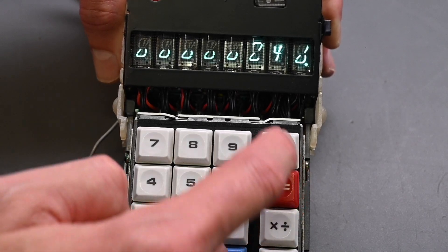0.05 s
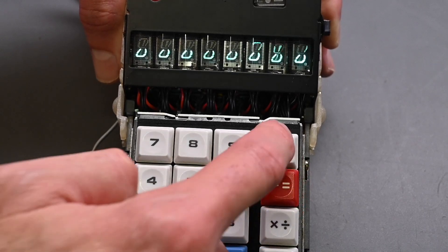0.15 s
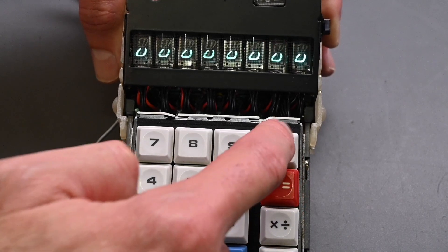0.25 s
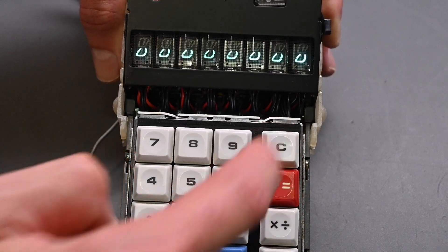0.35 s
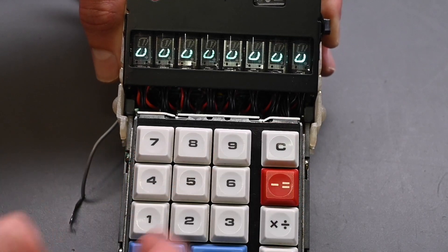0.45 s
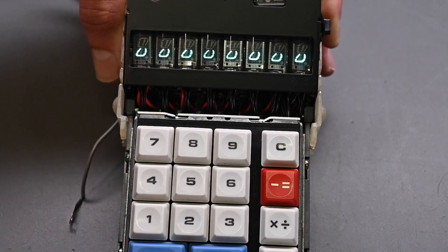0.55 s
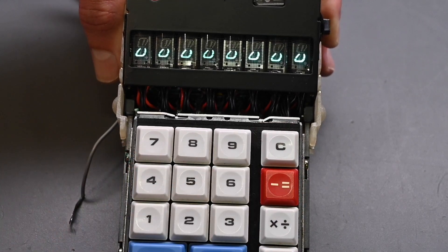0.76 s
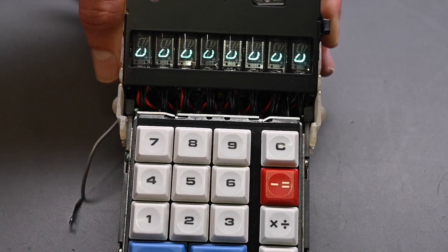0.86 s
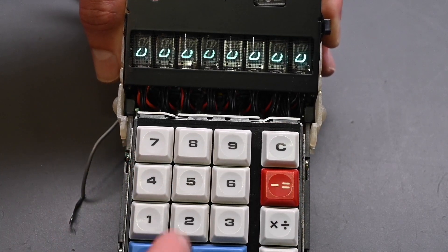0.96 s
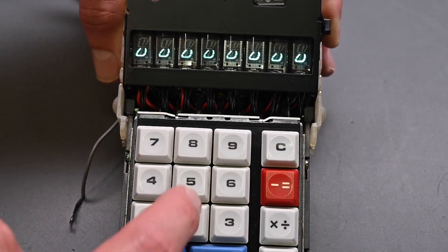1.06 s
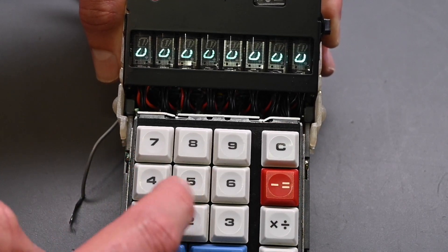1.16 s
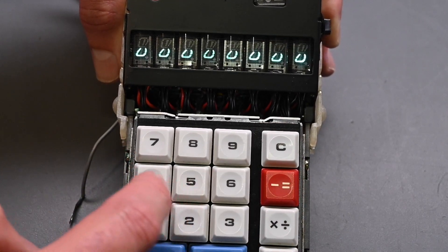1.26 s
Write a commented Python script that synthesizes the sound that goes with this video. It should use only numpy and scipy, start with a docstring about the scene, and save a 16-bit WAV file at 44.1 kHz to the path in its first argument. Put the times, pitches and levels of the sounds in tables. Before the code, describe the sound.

One calculator key is pressed and released up close, a crisp double plastic click with a thump

```python
"""In a small workshop, one key of an old handheld calculator is pressed and let go, heard from close by.
The finger taps the plastic cap, the key bottoms out with a thump into the bench, then springs back up.
Each contact is a burst of tiny rebounds plus ringing plastic and a room tail; case and bench ring as sines.
Coloured noise makes the rubs, a tick, the springy zing, and the faint fan-like whirr and hiss underneath."""
import sys
import numpy as np
from scipy import signal
from scipy.fft import rfft, irfft, next_fast_len
from scipy.io import wavfile

SR = 44100
rng = np.random.default_rng(int(sys.argv[2]) if len(sys.argv) > 2 else 0)


def wav_record(signal):
    """Record a signal, one row per channel, as 16-bit PCM in the file named by sys.argv[1]."""
    frames = np.transpose(np.atleast_2d(signal))
    bounded = np.clip(frames, -1, 1)
    # unit amplitude maps onto the largest positive 16-bit level
    quanta = np.round(bounded * 32767).astype(np.int16)
    wavfile.write(sys.argv[1], SR, quanta)


N = 57330
T = np.arange(N) / SR
# Side level: how loud the left-right difference is against the shared sound, in dB.
AIR_SIDE_DB, ROOM_SIDE_DB = -49.5, -38
RING_BUILD_S = 0.001


def from_db(db):
    """Turn decibels into a gain."""
    return 10 ** (np.asarray(db) / 20)


def rms_one(x):
    """Scale a sound to an rms (average strength) of 1."""
    return x / np.sqrt(np.mean(x ** 2) + 1e-20)


def colour(x, points):
    """Filter through (Hz, dB) points without any sound before the start (minimum phase)."""
    size = 2 * next_fast_len(N)
    hz, db = np.transpose(points)
    freq = np.maximum(np.arange(size // 2 + 1) * SR / size, 1)
    gain = from_db(np.interp(np.log(freq), np.log(hz), db))
    # Folding the cepstrum (the spectrum of the log gain) forward in time gives minimum phase.
    cepstrum = irfft(np.log(gain))
    cepstrum[1:size // 2] *= 2
    cepstrum[size // 2 + 1:] = 0
    response = np.exp(rfft(cepstrum))
    return irfft(rfft(x, size) * response)[..., :N]


def high_pass(x, hz):
    """Remove what lies below a frequency, gently."""
    return signal.sosfilt(signal.butter(2, hz, "high", fs=SR, output="sos"), x)


def noise(side_db):
    """Two channels of white noise that share a middle and differ by a side part."""
    mid, side = rng.standard_normal((2, N))
    return mid + from_db(side_db) * side * np.array([[1], [-1]])


def narrow_noise(hz, width_hz):
    """Noise through one narrow resonance: a wavering tone of rms 1."""
    freq = np.arange(N // 2 + 1) * SR / N
    resonance = 1 / (1 + ((freq - hz) / width_hz) ** 2)
    return rms_one(irfft(rfft(rng.standard_normal(N)) * resonance, N))


def dying(t60, build_s, start=0):
    """Envelope that builds up, then dies away by 60 dB in t60 seconds."""
    age = np.maximum(T - start, 0)
    return (1 - np.exp(-age / build_s)) * from_db(-60 * age / t60)


def mode(hz, t60, build_s):
    """One way a solid body rings: a sine that builds up and dies away."""
    return np.sin(2 * np.pi * hz * T) * dying(t60, build_s)


def delayed(x, s):
    """Start x at time s."""
    lag = int(s * SR)
    return np.concatenate([np.zeros_like(x[..., :lag]), x[..., :N - lag]], axis=-1)


def swelling(rows, spectrum, side_db):
    """Coloured noise under bell-shaped swells."""
    level = sum(from_db(db) * np.exp(-((T - s) / length) ** 2) for s, length, db in rows)
    return level * rms_one(colour(noise(side_db), spectrum))


def whirr():
    """Steady fan-like whirr: white noise given a mostly low colour."""
    # Colour of the whirr. Each row: frequency in Hz, relative level in dB.
    whirr_colour = [(25, -42), (45, -47), (70, -8.5), (105, -3.5), (150, -0.5), (195, -6.5), (255, -1.5),
                    (370, -5.5), (540, -7.5), (690, 1), (860, -5.5), (950, -8.5), (1250, -12), (1600, -8),
                    (1850, -17.5), (2400, -23), (3700, -17.5), (4500, -23), (8000, -28.5), (16000, -53)]
    whirr_db = -67
    return from_db(whirr_db) * rms_one(colour(noise(AIR_SIDE_DB), whirr_colour))


def wavering_tones():
    """Narrow bands of noise in the whirr, heard as tones that waver."""
    # The tones. Each row: frequency in Hz, width in Hz, rms level in dB.
    tones = [(742.7, 8.3, -73), (770, 14.6, -74.5), (841.8, 9.4, -75), (1667, 13.4, -77), (3743, 41, -87),
             (8780, 12, -94.5), (8785, 24, -93)]
    return sum(from_db(db) * narrow_noise(hz, width_hz) for hz, width_hz, db in tones)


def rumble_swells():
    """A low rumble of coloured noise swells briefly, twice."""
    # The swells. Each row: centre in seconds, length in seconds, level in dB.
    swells = [(.775, .06, -64.5), (1.25, 0.048, -74)]
    # Colour of the rumble. Each row: frequency in Hz, relative level in dB.
    swell_colour = [(40, -48), (100, 5.5), (150, -5), (250, 0), (450, -36), (750, -2.5), (1200, -32),
                    (4000, -41)]
    return swelling(swells, swell_colour, AIR_SIDE_DB)


def guide_rubs():
    """The key rubs in its guide: friction as short swells of coloured noise."""
    # The rubs. Each row: centre in seconds, length in seconds, level in dB.
    rubs = [(.238, 0.022, -64.5), (.2545, 0.0035, -54), (.29, 0.013, -61), (.324, 0.0066, -65.5),
            (.374, 0.0065, -62), (.57, 0.064, -78.5)]
    # Colour of the rubbing. Each row: frequency in Hz, relative level in dB.
    rub_colour = [(1000, -29), (2500, -9.5), (3400, -0.5), (5500, 10), (7500, 3), (10000, -4), (15000, -19)]
    return swelling(rubs, rub_colour, ROOM_SIDE_DB)


def held_tick():
    """The held key ticks once: a short, bright burst of noise."""
    # Colour of the tick. Each row: frequency in Hz, relative level in dB.
    tick_colour = [(2000, -30), (4000, -16), (5200, -4), (8000, 3), (10500, -9), (15000, -19)]
    tick_s, tick_db, tick_t60_s = .3188, -52.5, .028
    tick = rms_one(colour(noise(ROOM_SIDE_DB), tick_colour))
    return from_db(tick_db) * tick * dying(tick_t60_s, RING_BUILD_S, tick_s)


def spring_zing():
    """The freed spring zings: several close, wavering tones die away together."""
    # Close modes of the spring: one frequency in Hz for each.
    spring_hz = [9050, 9370, 9500, 9620, 9930]
    spring_s, spring_db, spring_t60_s = .382, -53.5, 0.23
    coils = rms_one(sum(narrow_noise(hz, width_hz=70) for hz in spring_hz))
    return from_db(spring_db) * coils * dying(spring_t60_s, RING_BUILD_S, spring_s)


def case_ring():
    """The case rings in a few low modes as the key comes back."""
    # Modes of the case. Each row: frequency in Hz, level in dB, t60 in seconds.
    case_modes = [(224.4, -52, 0.14), (673, -44, .055), (776, -48.5, 0.13), (1690, -55.5, 0.12)]
    start_s, build_s = .3875, 0.0014
    ring = sum(from_db(db) * mode(hz, t60, build_s) for hz, db, t60 in case_modes)
    return delayed(ring, start_s)


def bench_shake():
    """The bench shakes in mostly deep modes, each with its own build-up."""
    # Modes of the bench. Each row: frequency in Hz, relative level in dB, t60 in seconds, build-up in seconds.
    bench_modes = [(111, -22, 0.079, 0.065), (144.3, -28.5, 0.07, 0.0045), (163, -20, 0.098, 0.026),
                   (176.9, -27, 0.108, 0.0305), (189.3, -30, 0.22, 0.026), (100.6, -43, 0.35, 0.026),
                   (391, -52, 0.324, 0.0073), (558, -55.5, 0.27, 0.0019)]
    return sum(from_db(db) * mode(hz, t60, build_s) for hz, db, t60, build_s in bench_modes)


def thumps():
    """The key's end stops knock on the hollow case, which then shakes the bench."""
    # The blows. Each row: knock start in seconds, knock level in dB, knock t60 in seconds,
    # knock tilt in dB per octave, bench start in seconds, bench gain in dB.
    blows = [(0.2612, -47, 0.23, -2.5, .2661, -1), (0.3863, -53, 0.38, 2, .394, -19.5)]
    # Colour of a knock before its tilt. Each row: frequency in Hz, relative level in dB.
    knock_colour = [(25, -52), (50, -21), (110, -4), (220, 6.5), (330, -2.5), (500, -3.5), (700, -3),
                    (900, -13.5), (1300, -22), (2500, -36)]
    knock_build_s = 0.0012
    bench = bench_shake()
    out = np.zeros((2, N))
    for knock_s, knock_db, t60, tilt_db, bench_s, bench_db in blows:
        tilted = [(hz, db + tilt_db * np.log2(hz)) for hz, db in knock_colour]
        knock = rms_one(colour(noise(AIR_SIDE_DB), tilted))
        out += from_db(knock_db) * knock * dying(t60, knock_build_s, knock_s)
        out += from_db(bench_db) * delayed(bench, bench_s)
    return out


def room_response():
    """Echoes blurred into a noise tail of unit energy; the treble dies first."""
    split_hz, build_s = 5500, 0.0016
    low_t60_s, treble_t60_s = 0.39, 0.27
    white = noise(ROOM_SIDE_DB)
    low = signal.sosfilt(signal.butter(2, split_hz, fs=SR, output="sos"), white)
    high = high_pass(white, split_hz)
    # Subtracting keeps the two bands from cancelling where they meet.
    tail = low * dying(low_t60_s, build_s) - high * dying(treble_t60_s, build_s)
    return rms_one(tail) / np.sqrt(N)


def chatter(spacing_ms, count=4):
    """A hard contact and its quick, weakening rebounds, as single-sample pulses."""
    loss_db = 3.5  # per rebound
    pulses = np.zeros(N)
    for k in range(count):
        pulses[int(k * spacing_ms * SR / 1000)] += from_db(-loss_db * k)
    return pulses


def key_clicks():
    """Each contact chatters, rings the plastic in dense and in single modes, and sounds the room."""
    # Tap, bottoming and return. Each row: start in seconds, level in dB, chatter spacing in ms,
    # dense ring level in dB, dense ring t60 in seconds, room level in dB.
    clicks = [(0.2109, -6.5, .76, 2, 0.02, -18.5), (0.2589, -4.5, .58, 0, 0.047, -19.5),
              (0.3807, -5.5, 0.84, 4, 0.025, -16)]
    # Colour of the tap on the cap. Each row: frequency in Hz, level in dB.
    tap_colour = [(50, -51), (700, -29), (2000, -34), (2700, -42), (3300, 1), (4000, -36.5), (4800, -0.5),
                  (5800, -17.5), (7300, -0.5), (9300, -10), (10100, -1), (11800, -21), (14300, -19),
                  (15300, -16)]
    # Colour of the key bottoming out. Each row: frequency in Hz, level in dB.
    bottom_colour = [(50, -31), (300, -16), (1300, -36.5), (2000, -11.5), (3300, -6), (4100, -14.5),
                     (5300, -6.5), (7100, -1.5), (9000, -4.5), (11500, -5), (12400, -14.5), (14300, -9),
                     (15300, -6)]
    # Colour of the key coming back up. Each row: frequency in Hz, level in dB.
    return_colour = [(50, -49), (300, -17), (1000, -20), (1450, -12.5), (1780, -2), (2450, -6.5),
                     (2950, -11), (4100, -17), (5700, -6), (7400, -8), (8500, 0), (9900, -4), (11200, -9),
                     (12700, -18), (14500, -12), (15500, -8)]
    # Modes of key and frame. Each row: frequency in Hz, t60 in seconds, level in dB at the tap,
    # level in dB at bottoming, level in dB at the return.
    key_modes = [(1788, .035, -78, -67, -41.5), (3324, 0.054, -45, -43, -47.5),
                 (4754, 0.024, -33, -44, -35), (5650, 0.043, -42, -71, -39.5), (6760, 0.039, -60, -59, -36),
                 (7310, .04, -43, -52, -46), (7800, 0.024, -41, -58, -49), (8450, 0.011, -44, -53, -29),
                 (8460, 0.017, -55, -57, -64), (9120, 0.091, -66, -51, -43.5), (9440, 0.057, -64, -56, -59),
                 (10250, 0.031, -60, -66, -45), (15300, 0.018, -62, -45, -60),
                 (15480, 0.052, -44, -50, -39)]
    side_db = -14
    room_colour_share = 0.6  # the room evens out a contact's colour
    spectra = (tap_colour, bottom_colour, return_colour)
    out = np.zeros((2, N))
    for k, (row, spectrum) in enumerate(zip(clicks, spectra)):
        s, db, spacing_ms, ring_db, ring_t60, room_db = row
        dense = rms_one(noise(side_db) * dying(ring_t60, RING_BUILD_S)) / np.sqrt(N)  # unit energy
        struck = chatter(spacing_ms) + from_db(ring_db) * dense
        click = from_db(db) * colour(struck, spectrum)
        for hz, t60, *strength_db in key_modes:
            click = click + from_db(strength_db[k]) * mode(hz, t60, RING_BUILD_S)
        room_colour = [(hz, room_colour_share * level) for hz, level in spectrum]
        room = colour(room_response(), room_colour)
        out += delayed(click + from_db(room_db) * room, s)
    return out


def scene():
    """Background, small key noises, thumps and clicks together."""
    background = whirr() + wavering_tones() + rumble_swells()
    key_details = guide_rubs() + held_tick() + spring_zing()
    return background + key_details + case_ring() + thumps() + key_clicks()


def record(dry):
    """Two channels, nearly alike below the treble, each with its own hiss; bass and top are cut."""
    side_low_cut_hz = 6530  # the left-right difference is kept mainly above this
    hiss_db, low_cut_hz, cutoff_hz = -73, 49, 15800
    mid, side = (dry[0] + dry[1]) / 2, (dry[0] - dry[1]) / 2
    side = high_pass(side, side_low_cut_hz)
    hiss = from_db(hiss_db) * rng.standard_normal((2, N))
    heard = high_pass(np.array([mid + side, mid - side]) + hiss, low_cut_hz)
    return signal.sosfilt(signal.ellip(12, .1, 70, cutoff_hz, fs=SR, output="sos"), heard)


dry = scene()
out = record(dry)
wav_record(out)
```